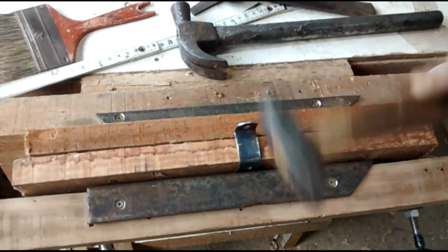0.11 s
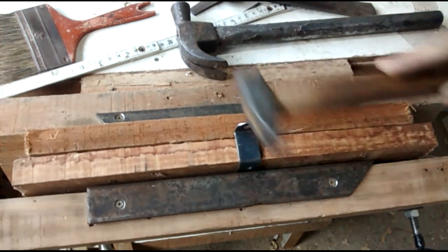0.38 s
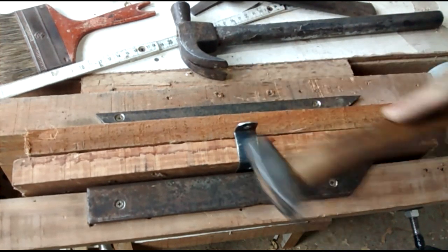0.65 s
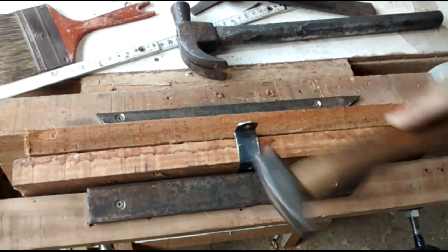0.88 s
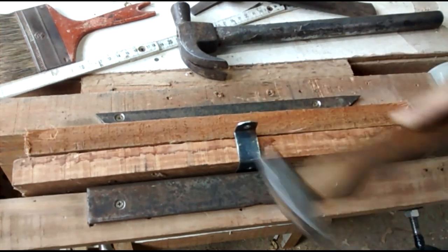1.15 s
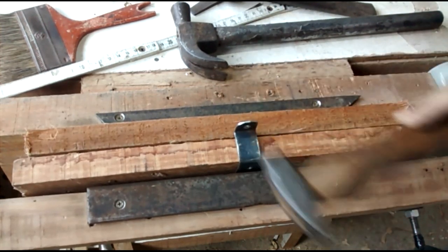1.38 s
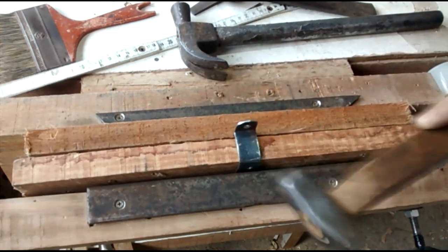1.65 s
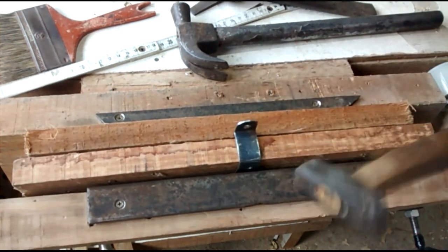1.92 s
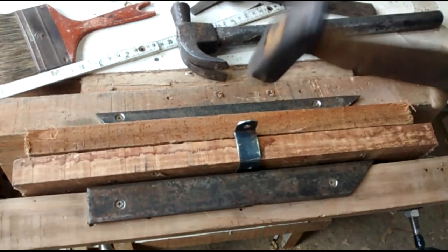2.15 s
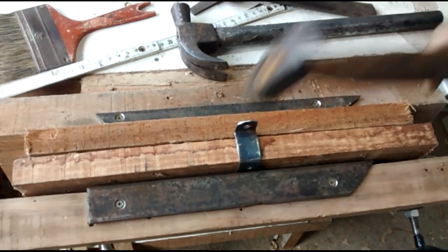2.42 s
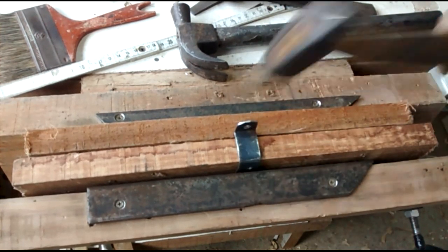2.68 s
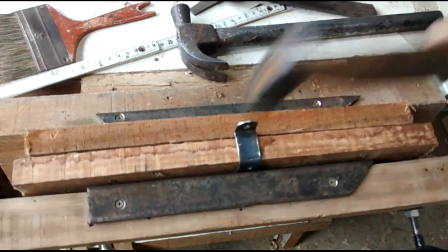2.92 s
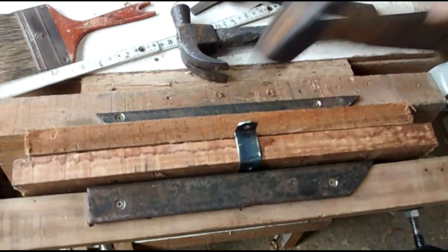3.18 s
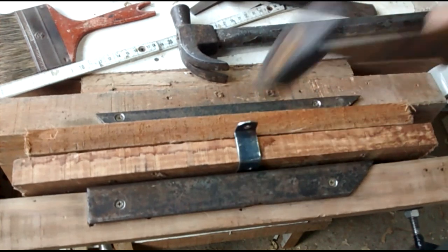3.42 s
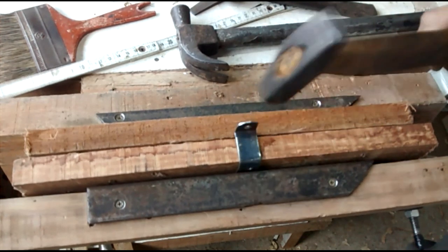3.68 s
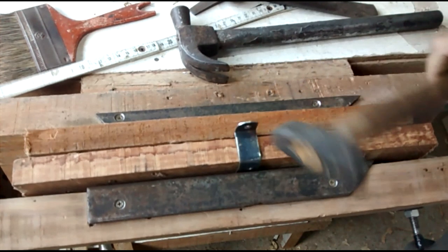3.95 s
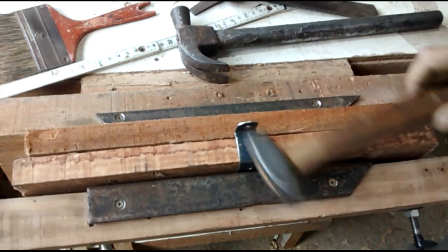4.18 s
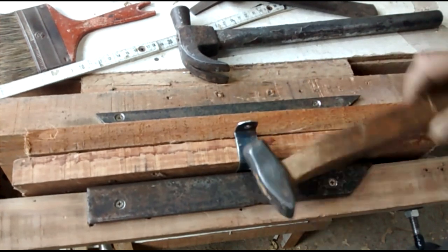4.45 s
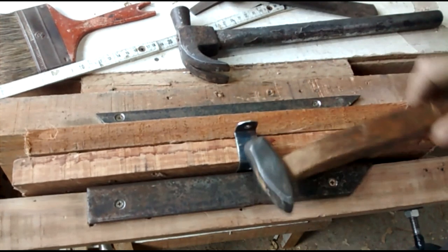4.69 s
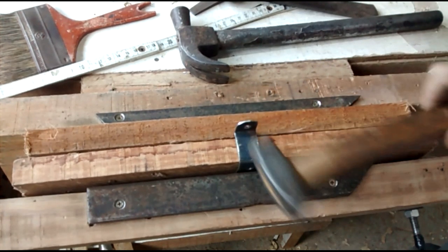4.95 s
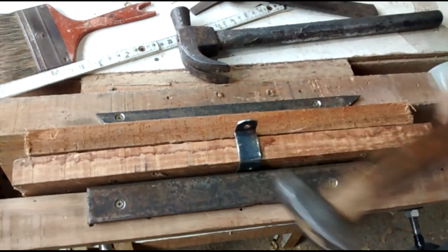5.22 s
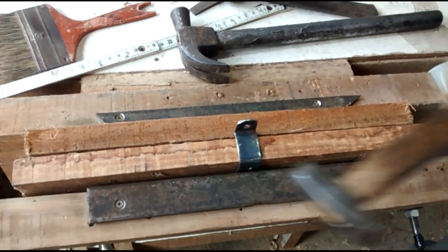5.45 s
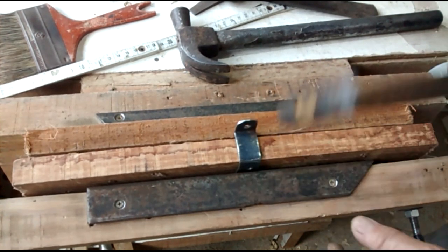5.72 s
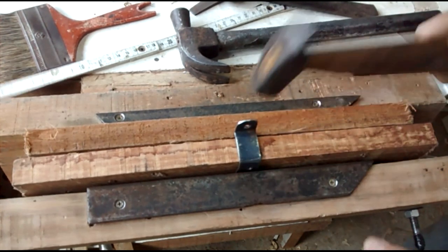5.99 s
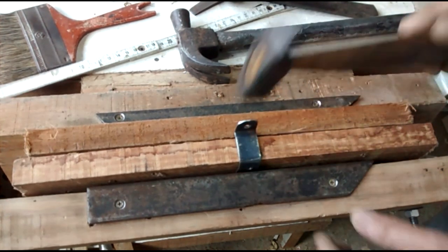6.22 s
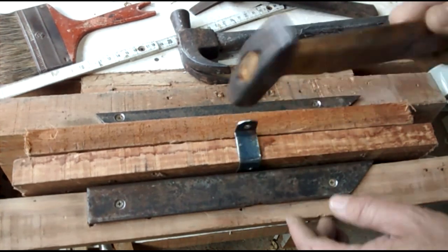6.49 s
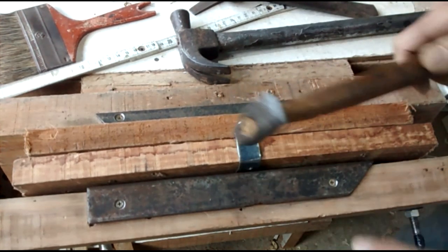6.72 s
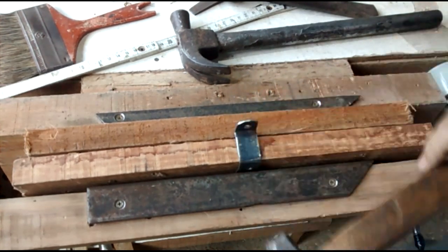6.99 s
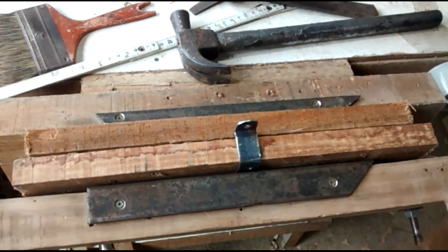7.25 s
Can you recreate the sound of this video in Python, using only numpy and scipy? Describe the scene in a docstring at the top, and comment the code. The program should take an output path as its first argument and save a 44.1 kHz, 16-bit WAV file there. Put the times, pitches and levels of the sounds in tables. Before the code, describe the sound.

Quick regular hammering on clamped steel, roughly four blows a second. Sideways blows are dry, bright, stuttering double taps; downward blows are much louder, cracking and slightly overloaded, with wood and bench beneath. Brief pauses separate the runs. Loose metal ticks and rings faintly high up, and a small hard room leaves a half-second noisy tail over a quiet low drone.

```python
"""A hammer beats a steel strip clamped between wooden battens, in quick runs, in a small workshop.
Each main contact layers noise bursts and dying modes: steel tick, strip clang, batten knock, bench thump, vise ring.
Light rebounds and loose tools click between the blows; a loose steel bar rings on, and thin hisses sink high up.
Hard echoes and noise-like tails make the room; an engine of two harmonics drones far off under steady air noise.
The hardest blows overload the amplifier."""
import sys
import numpy as np
from scipy import signal
from scipy.fft import rfft, irfft
from scipy.io import wavfile
from scipy.ndimage import uniform_filter1d

SR = 44100
rng = np.random.default_rng(int(sys.argv[2]) if len(sys.argv) > 2 else 0)


def wav_out(sig):
    """Save sig, one row per channel (or a flat mono array), as 16-bit PCM at SR to the path in sys.argv[1]."""
    wavfile.write(sys.argv[1], SR, np.round(np.clip(np.atleast_2d(sig).T, -1, 1) * 32767).astype(np.int16))


def decibels_to_gain(level_db):
    """Convert a level in decibels to a linear amplitude gain (20 dB per decade)."""
    exponent = np.asarray(level_db, float) / 20
    return 10 ** exponent


N = 325017
PAD = SR // 5  # lead-in samples, so that a sound may start before time zero

# All levels are relative: the functions add an offset to balance the layers.
# main hammer contacts, with many of their bounces:
# (time [s], tick level [dB], clang level [dB], clang pitch [Hz], knock level [dB])
CONTACTS = [(-0.05, 1.5, -13, 4010, -5), (0.367, -11, -15.5, 2930, -36.5),
            (0.3783, -21, -24.5, 1730, -35.5), (0.6741, -13, -9, 2500, -24), (0.679, 3, -8, 6450, -20),
            (0.9139, -7.5, -11.5, 4750, -22.5), (0.9242, -7.5, -2, 2690, -17),
            (1.1621, -0.5, -2.5, 2560, -14), (1.1706, -9.5, -4, 2973, -13.5),
            (1.3964, -17.5, -7, 1400, -14), (1.3999, -8.5, -2.5, 2560, -23.5),
            (1.4134, -9, -7, 2924, -20.5), (1.6146, -9.5, -13.5, 2290, -21.5),
            (1.6176, -17.5, -5.5, 2945, -38.5), (1.6264, -6.5, -5, 2427, -16),
            (1.833, -14.5, -7, 2535, -25), (1.8363, -5, -1.5, 2560, -26.5), (1.8438, -13.5, -40, 2560, -16),
            (2.3538, -10.5, -19.5, 2500, -29), (2.3593, 1.5, -3, 2784, -8.5),
            (2.6238, 10, -0.5, 3144, -3.5), (2.8789, 8.5, 3.5, 1940, -0.5), (3.1246, 5, 1.5, 2093, 1),
            (3.3657, -0.5, -15.5, 2515, -17.5), (3.3711, 6.5, 5.5, 2052, 2), (3.6216, 7, 6.5, 1972, 0.5),
            (3.8451, 5.5, -9, 1902, 3), (3.8792, -8.5, -6, 1850, -17), (4.3057, -10, -17.5, 3800, -25),
            (4.3092, -13.5, -13, 2560, -25.5), (4.5202, -4, -7.5, 2566, -23),
            (4.5303, -43, -23, 2550, -20.5), (4.5562, -8, -10.5, 3290, -23.5),
            (4.5591, -20, -8.5, 2080, -26.5), (4.7531, -7.5, -5.5, 1406, -17),
            (4.7552, -2.5, 1, 2710, -14.5), (4.7645, -35.5, 1.5, 2088, -19),
            (4.9752, -5.5, -1.5, 2616, -20.5), (4.9873, -14, -31, 2500, -14.5), (5.189, -3, -11, 2430, -27),
            (5.2, -40, -25, 2300, -15.5), (5.432, -5.5, -5.5, 2413, -26.5),
            (5.4432, -13.5, -22, 1880, -15.5), (5.9476, 3, 4, 2935, -7), (6.1801, 4.5, 5.5, 2060, -1),
            (6.4221, 6, -1, 4640, -7.5), (6.656, 6.5, 7.5, 2912, -8.5), (6.691, -9, -22, 2730, -14.5),
            (7.184, 4.5, 1.5, 2014, -5.5), (7.1977, 2, 0, 1008, -15), (7.2087, -8, -9, 2560, -27.5),
            (7.234, -12.5, -10, 2226, -20)]
# moments when the hammer changes from downward to sideways blows and back: (time [s])
DIRECTION_CHANGES = [0.2, 2.1, 4.2, 5.7]
# small clicks between the blows, light hammer rebounds and loose tools:
# (time [s], click level [dB], pitch [Hz], wood tap level [dB])
SMALL_CLICKS = [(0.19, -56, 7000, -30.5), (0.2286, -54.5, 6800, -31), (0.9512, -42, 6600, -42),
                (2.6733, -16, 7400, -23), (2.6783, -17.5, 2820, -40.5), (2.9204, -15, 8420, -44),
                (3.162, -17, 8200, -44.5), (3.2944, -54, 7540, -41), (3.4158, -21.5, 6440, -40),
                (3.5328, -40.5, 7360, -43.5), (3.6578, -17.5, 8400, -40), (3.7549, -38, 6700, -47),
                (3.7894, -50.5, 6400, -47), (3.826, -37.5, 7870, -40), (3.9743, -31, 6200, -37.5),
                (4.0064, -35, 6200, -44.5), (4.0178, -34, 7900, -45.5), (4.0811, -46, 6920, -38),
                (6.1467, -39, 7530, -29), (6.3744, -34, 8230, -42), (6.4035, -41, 7500, -54.5),
                (6.4115, -30.5, 7900, -47), (6.4717, -19.5, 7800, -47), (6.609, -45.5, 7810, -47),
                (6.8044, -35.5, 6940, -44), (6.8473, -41, 6700, -51), (6.8613, -38.5, 6300, -32),
                (6.8867, -49, 6530, -24.5), (6.8964, -42, 6940, -26), (6.9935, -56, 8520, -34),
                (7.0102, -58, 5500, -38), (7.072, -50, 2160, -50)]
# jolts that set a loose steel bar ringing: (time [s], level [dB])
BAR_JOLTS = [(0.06, -59.5), (0.95, -58), (2.421, -57), (2.70, -51), (3.01, -52.5), (3.201, -55),
             (3.534, -52), (3.704, -48), (3.975, -45), (4.014, -50), (5.552, -61.5), (5.999, -51.5),
             (6.698, -54)]
# faint narrow hisses high up: (time [s], length [s], start pitch [Hz], level [dB])
HISSES = [(1.70, 0.16, 11900, -60), (5.574, 0.11, 11900, -66.5), (5.765, .14, 12020, -67),
          (6.119, .06, 12100, -70), (6.97, 0.096, 9000, -64), (6.975, .07, 6050, -60),
          (7.05, .12, 10800, -68)]
# drone of a distant engine: (time [s], pitch of the lower harmonic before wobble [Hz], level [dB])
ENGINE = [(0.0, 66, -41), (0.45, 58, -54), (1.3, 53, -48.5), (2.2, 52, -54), (2.9, 62, -51.5),
          (3.7, 68, -45), (4.15, 72, -53), (5.3, 76, -46), (5.7, 79.75, -46), (5.92, 78.55, -45),
          (6.05, 68.4, -45.5), (6.5, 72, -46), (7.15, 75, -52.5), (7.37, 74, -37)]

# Resonances of each struck thing.
# steel strip: (pitch [Hz], level struck downward [dB], level struck sideways [dB], t60 [s])
STRIP_MODES = [(2150, -3, -14, 0.045), (2150, -12, -11, 0.012), (2560, 2, -8.5, 0.026),
               (2920, 4.5, -14, 0.01), (3208, -9.5, -12.5, 0.024)]
# hammer head: (pitch [Hz], level struck downward [dB], level struck sideways [dB], t60 [s])
HAMMER_MODES = [(3630, 6, 0, 0.0076), (4736, 0.5, -10.5, 0.0089), (5750, -13, -1, 0.0077),
                (6270, -16.5, -18, 0.0027), (8010, -4, -7.5, .01), (9040, -5.5, -8, 0.0074),
                (11130, -13.5, -4.5, .008), (13000, -13.5, -16, 0.016)]
# wooden battens: (pitch [Hz], level struck downward [dB], level struck sideways [dB], t60 [s])
BATTEN_MODES = [(690, -12.5, -13.5, 0.0099), (790, -4, -10.5, 0.035), (934, -3, -12, 0.033),
                (1045, 4.5, 2, 0.016), (1197, -2, 1, 0.09), (1414, -5, -2.5, 0.081),
                (1510, -10.5, -9, 0.011), (1760, -2.5, -17, 0.007), (1850, 8.5, -8, 0.0071)]
# bench: (pitch [Hz], level struck downward [dB], level struck sideways [dB], t60 [s])
BENCH_MODES = [(98, -16.5, -1.5, 0.16), (140.9, -11.5, -6, 0.38), (191.8, 7, 6.5, 0.1),
               (231.3, -2, -0.5, 0.31), (262, 2.5, 0.5, 0.16), (316.7, -0.5, -0.5, 0.22),
               (416, -1, 0, 0.11), (461.7, 5.5, -2.5, .06), (511, -17, -9.5, 0.13), (539, -7.5, -9.5, 0.12)]
# bench legs: (pitch [Hz], level struck downward [dB], level struck sideways [dB], t60 [s])
LEG_MODES = [(61, -20.5, -11, 0.083), (86, -19.5, -4, 0.12)]
# vise: (pitch [Hz], level struck downward [dB], level struck sideways [dB], t60 [s])
VISE_MODES = [(1730, -33, -29, .3), (2470, -31.5, -24, 0.25), (3580, -36.5, -29, 0.3),
              (4670, -29, -37.5, 0.13), (4960, -33.5, -46.5, 0.23), (6440, -40, -32.5, 0.067),
              (7140, -47, -49, .2), (9900, -46.5, -48, 0.2), (10400, -47, -46, 0.13),
              (11900, -47.5, -41.5, 0.16)]
# loose steel bar: (pitch [Hz], level struck downward [dB], level struck sideways [dB], t60 [s])
BAR_MODES = [(5480, 2.5, 2.5, .9), (5599, -6, -6, .8)]

# Noise colours.
# steel on steel, struck downward: (frequency [Hz], level [dB])
DOWN_TICK = [(880, -28), (1500, -1.5), (1900, -21), (2040, -5.5), (2660, -16.5), (2880, -9), (3410, -8.5),
             (5280, -1.5), (6630, -9.5), (14900, -24.5), (16000, -37.5)]
# steel on steel, struck sideways: (frequency [Hz], level [dB])
SIDE_TICK = [(880, -34.5), (1500, -6), (1640, -15), (2910, -3), (4460, -7.5), (4780, -3), (5540, -6),
             (6500, -14), (7320, -17.5), (14600, -23), (16000, -35)]
# the wood's countless short modes: (frequency [Hz], level [dB])
SPLINTER = [(300, -15), (700, -8), (1500, 5.5), (2500, 3), (4000, -7.5), (8000, -33)]
# the bench's countless short modes: (frequency [Hz], level [dB])
THUD = [(30, -39), (90, -10.5), (300, 6), (600, -8.5), (1200, -17.5), (4000, -34.5)]
# quiet of the shop: (frequency [Hz], level per Hz [dB])
AIR = [(15, -47.5), (25, -19.5), (49, -21.5), (92, 2.5), (130, -16.5), (175, 0), (206, -11.5), (285, -12.5),
       (714, -20), (4870, -31), (7510, -45), (11600, -49), (16000, -58.5)]

# decay of the room: (frequency [Hz], t60 [s])
ROOM_T60 = [(60, 0.45), (160, 0.5), (420, 0.58), (1100, 0.41), (2910, 0.43), (7680, 0.3)]
# strength of the room's tail against the direct sound: (frequency [Hz], level [dB])
ROOM_DB = [(60, 0), (200, -13), (600, 7), (1500, -2), (3000, -5.5), (6000, -9.5), (12000, -11.5)]
# hard reflections from bench top and walls: (delay [s], level [dB])
ECHOES = [(.0021, -14.5), (.0047, -15.5), (.0083, -20), (.0118, -23.5), (.0165, -17.5)]


def read(points, hz):
    """Looks a spectrum up on a log-frequency axis."""
    f, value = np.transpose(points)
    return np.interp(np.log(hz + 1), np.log(f + 1), value)


def add(mix, s, sound):
    """Mixes a sound in at time s, counted from the end of the lead-in."""
    part = mix[PAD + round(s * SR):][:len(sound)]
    part += sound[:len(part)]


def together(*sounds):
    """Starts layers of any length at the same instant, cut off after 0.4 s."""
    out = np.zeros(2 * PAD)
    for sound in sounds:
        part = out[:len(sound)]
        part += sound[:len(part)]
    return out


def peak_one(x):
    """Scales to a peak of 1."""
    return x / np.max(abs(x))


def ring(modes, chance, sideways, rise_s, detune=.02):
    """Dying sines; each blow lands a little elsewhere, so strengths, pitches and phases vary."""
    spread_db = 3
    hz, down_db, side_db, t60 = np.transpose(modes)[:, :, None]
    t = np.arange(round(1.2 * t60.max() * SR)) / SR
    luck, shift, phase = 2 * chance[:, :len(modes), None] - 1
    struck_db = side_db if sideways else down_db
    db = struck_db + spread_db * luck - 60 * t / t60
    tones = decibels_to_gain(db) * np.sin(2 * np.pi * hz * (1 + detune * shift) * t + np.pi * phase)
    return tones.sum(0) * (1 - np.exp(-t / rise_s))


def burst(noise, colour, t60, rise_s):
    """A quick-dying puff of coloured noise, as from modes too dense to tell apart."""
    hz, t = np.fft.rfftfreq(len(noise), 1 / SR), np.arange(len(noise)) / SR
    coloured = irfft(rfft(noise) * decibels_to_gain(read(colour, hz)), len(noise))
    shape = decibels_to_gain(-60 * t / t60) * (1 - np.exp(-t / rise_s))
    return peak_one(coloured * shape)


def air():
    """The quiet of the shop: steady coloured noise."""
    rms_db = -48
    hz = np.fft.rfftfreq(N, 1 / SR)
    hiss = irfft(rfft(rng.standard_normal(N)) * decibels_to_gain(read(AIR, hz)), N)
    return decibels_to_gain(rms_db) * hiss / hiss.std()


def engine():
    """A distant drone: two low harmonics, unsteady in pitch and level."""
    pitch_wobble, level_wobble_db = .03, 0.9  # share of the pitch, and dB, per deviation
    s, *columns = np.transpose(ENGINE)
    hz, db = (np.interp(np.arange(N) / SR, s, column) for column in columns)
    wobble = rng.standard_normal((2, N))
    for _ in range(2):
        wobble = uniform_filter1d(wobble, 1500)
    wobble /= wobble.std()
    cycles = np.cumsum(hz * (1 + pitch_wobble * wobble[0])) / SR
    harmonics = np.sin(2 * np.pi * cycles) + decibels_to_gain(-2.5) * np.sin(4 * np.pi * cycles)
    return decibels_to_gain(db + level_wobble_db * wobble[1]) * harmonics


def hisses():
    """Narrow noise bands, low-passed noise on a sine carrier, that sink while they swell and fade."""
    sag, width_hz = .045, 800  # each sinks by this share of its pitch
    lowpass = signal.butter(2, width_hz / 2, fs=SR, output="sos")
    out = np.zeros(N + PAD)
    for (s, length, hz, db), noise in zip(HISSES, rng.standard_normal((len(HISSES), 8192))):
        u = np.linspace(0, 1, round(length * SR))
        fuzz = signal.sosfilt(lowpass, noise)[:len(u)]
        tone = np.sin(2 * np.pi * np.cumsum(hz * (1 - sag * u ** 2)) / SR)
        swell = np.sqrt(np.sin(np.pi * u) + 1e-9)
        add(out, s, decibels_to_gain(db) * fuzz / fuzz.std() * tone * swell)
    return out[PAD:]


def spread_out(sound):
    """The shortest (minimum-phase) click whose spectrum is that of the sound, evened out."""
    # the room hears every side of the work, which evens the spectrum over this share of the pitch either way
    blend, size = 0.078, 8192
    total = np.cumsum(abs(rfft(sound, size)) ** 2)
    k = np.arange(len(total))
    low, high = k * (1 - blend) - 2, k * (1 + blend) + 2
    power = (np.interp(high, k, total) - np.interp(low, k, total)) / (high - low)
    cepstrum = irfft(np.log(power + 1e-14) / 2)
    # folding the cepstrum forward gives minimum phase
    cepstrum[1:size // 2] *= 2
    cepstrum[size // 2 + 1:] = 0
    return irfft(np.exp(rfft(cepstrum)))[:size // 2]


def tail():
    """Reverberation: sparse taps of random sign, each band swelling and dying at its own speed."""
    spacing = 20  # samples
    at = np.arange(100, SR - spacing, spacing)
    taps = np.zeros(SR)
    taps[at + rng.integers(0, spacing, len(at))] = rng.choice([-1., 1.], len(at))
    hz, t, z = signal.stft(taps, SR, nperseg=256)
    swell_s = read([(100, 0.011), (1000, 0.0084), (8000, 0.0026)], hz)[:, None]
    fall = decibels_to_gain(-60 * t / read(ROOM_T60, hz)[:, None]) * (1 - np.exp(-t / swell_s))
    fall *= decibels_to_gain(read(ROOM_DB, hz))[:, None] / np.linalg.norm(fall, axis=1, keepdims=True)
    # the root makes up for the tap spacing against the 128-sample hop of the analysis
    return signal.istft(z * fall, SR, nperseg=256)[1] * np.sqrt(spacing / 128)


def workshop(sounds):
    """Direct sound with a few hard echoes; no two blows land alike, so they take turns among several tails."""
    tails, travel_s = 4, .0007  # travel from the vise to the microphone
    direct, feeds = np.zeros(N + PAD), np.zeros((tails, N + PAD))
    for k, (s, sound, sent) in enumerate(sounds):
        s += travel_s
        add(direct, s, sound)
        for n, (late_s, db) in enumerate(ECHOES):
            add(direct, s + late_s, (-1) ** n * decibels_to_gain(db) * sound)
        add(feeds[k % tails], s, spread_out(sent))
    reverb = sum(signal.fftconvolve(feed, tail())[:N + PAD] for feed in feeds)
    return (direct + reverb)[PAD:]


def loose_bar():
    """A loose steel bar jolted into ringing: two long, pure modes."""
    out = np.zeros(N + PAD)
    for (s, db), chance in zip(BAR_JOLTS, rng.random((len(BAR_JOLTS), 3, 2))):
        add(out, s, decibels_to_gain(db) * ring(BAR_MODES, .5 + .3 * chance, 0, .025, detune=0))
    return out[PAD:]


def small_click(row, chance, noise):
    """A light hammer rebound or a loose tool: a click with one short note in it, over a tap on wood."""
    s, db, hz, wood_db = row
    colour = [(1500, -12.5), (4000, 2.5), (9000, 0.5), (12000, -17.0), (16000, -36.0)]  # (Hz, dB)
    click = decibels_to_gain(db + 0.5) * burst(noise[0], colour, .01, .0004)
    note = decibels_to_gain(db - 1) * ring([(hz, -.5, -.5, .015)], chance, 0, 0.00041, detune=0)
    tap = decibels_to_gain(wood_db) * burst(noise[1], SPLINTER, 0.016, 0.00078)
    sound = together(click, note, tap)
    return s, sound, sound


def small_clicks():
    """Every small click as (time [s], direct sound, sound sent into the room)."""
    chances = rng.random((len(SMALL_CLICKS), 3, 1))
    noises = rng.standard_normal((len(SMALL_CLICKS), 2, 1024))
    return list(map(small_click, SMALL_CLICKS, chances, noises))


def clatter(noise, chance):
    """Loose parts hop after a blow: tiny scattered touches of steel, thinning out."""
    rarity, t60 = 2.9, 0.27  # only noise peaks this many deviations high count as a hop; s
    t = np.arange(len(noise[0])) / SR
    hops = (abs(noise[1]) > rarity) * noise[2] * decibels_to_gain(-60 * t / t60) * (t > .008)
    tick = burst(noise[0][:512], DOWN_TICK, 0.0086, .0002)
    touch = tick + decibels_to_gain(-8) * ring(STRIP_MODES, chance, 0, .0003)[:512]
    return signal.fftconvolve(hops, touch)


def chatter(noise):
    """A quick random flutter of strength, as loose iron parts touch and part."""
    flutter = np.interp(np.arange(2 * PAD) / 350, np.arange(len(noise)), noise)
    return 0.72 + 0.31 * flutter


def vise(tick_db, chance, noise, side):
    """The iron vise rings on, fluttering; its strengths scatter widely from blow to blow."""
    iron = ring(VISE_MODES, 2.2 * chance - .75, side, 0.0024, detune=0.013)
    return decibels_to_gain(tick_db) * iron * chatter(noise)[:len(iron)]


def bench(knock_db, chance, noise, side):
    """The bench takes less of the knock from above than of a shove from the side."""
    # from above the thump grows more slowly than the knock
    thump_db = 2.5 + knock_db if side else -8 + 0.55 * knock_db
    # the heavy bench swings up slowly
    top = decibels_to_gain(thump_db - 3.5) * ring(BENCH_MODES, chance, side, 0.013, detune=0.012)
    # the shove always starts the legs the same way
    legs = decibels_to_gain(thump_db) * ring(LEG_MODES, np.full((3, 2), .5), side, 0.0078)
    thud = decibels_to_gain(thump_db + 2.0) * burst(noise, THUD, 0.084, 0.0017)
    return together(top, legs, thud)


def battens(knock_db, chance, noise, side):
    """The wood knocks: its main modes, and noise for the many short ones."""
    knock = decibels_to_gain(knock_db - 7) * ring(BATTEN_MODES, chance, side, 0.0014)
    splinter = decibels_to_gain(knock_db + 5) * burst(noise, SPLINTER, 0.062, 0.00072)
    return together(knock, splinter)


def strip(clang_db, hz, chance, tuned_chance, side):
    """The strip clangs: its own modes, and the strongest one, tuned by the hammer's weight."""
    own = decibels_to_gain(clang_db - 3.5) * ring(STRIP_MODES, chance, side, 0.00022)
    tuned_modes = [(hz, -.5, -.5, .025), (hz, -20, -22, .25)]
    tuned = decibels_to_gain(clang_db) * ring(tuned_modes, tuned_chance, side, 0.0001, detune=0)
    return together(own, tuned)


def hammer_tick(tick_db, chance, noise, side):
    """Steel meets steel: a bright noise tick and the short modes of the hammer head."""
    tick = decibels_to_gain(tick_db - 2.5) * burst(noise, SIDE_TICK if side else DOWN_TICK, 0.028, 0.0002)
    head = decibels_to_gain(tick_db - 7) * ring(HAMMER_MODES, chance, side, 0.00025)
    return together(tick, head)


def contact(row, chance, noise):
    """One main contact: a broad body, and apart from it the narrow rings of strip and vise."""
    s, tick_db, clang_db, hz, knock_db = row
    clatter_db = -13  # against the knock
    clang_to_room_db = -6.5  # the small strip beams its clang at the microphone more than into the room
    side = np.searchsorted(DIRECTION_CHANGES, s) % 2
    body = together(hammer_tick(tick_db, chance[0], noise[0], side),
                    battens(knock_db, chance[2], noise[1], side),
                    bench(knock_db, chance[3], noise[2], side),
                    decibels_to_gain(knock_db + clatter_db) * clatter(noise, chance[4]))
    clang = together(strip(clang_db, hz, chance[1], chance[0], side),
                     vise(tick_db, chance[4], noise[2], side))
    return s, body + clang, body + decibels_to_gain(clang_to_room_db) * clang


def hammering():
    """The main contacts as (time [s], direct sound, sound sent into the room)."""
    chances = rng.random((len(CONTACTS), 5, 3, 12))
    noises = rng.standard_normal((len(CONTACTS), 3, 4096))
    return list(map(contact, CONTACTS, chances, noises))


def scene():
    """Hammer and small clicks sound in the room; bar, hisses, air and engine are laid in dry."""
    # the bench is too small to radiate deep bass
    highpass = signal.butter(4, 65, "high", fs=SR, output="sos")
    struck = signal.sosfilt(highpass, workshop(hammering() + small_clicks()))
    return (struck + loose_bar() + hisses() + air() + engine())[None]


def top_cut(x):
    """Nothing passes above the cut-off."""
    return signal.sosfilt(signal.butter(12, 16340, fs=SR, output="sos"), x)


def record(dry):
    """The amplifier bends over at full scale and loses the deepest bass."""
    knee = 9.6  # higher bends more abruptly
    bent = 0.96 * dry / (1 + abs(dry) ** knee) ** (1 / knee)
    highpass = signal.butter(1, 30, "high", fs=SR, output="sos")
    mix = signal.sosfilt(highpass, bent)
    return top_cut(mix)


dry = scene()
out = record(dry)
wav_out(out)
```